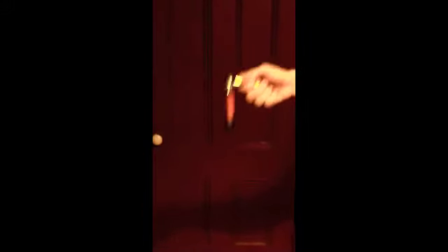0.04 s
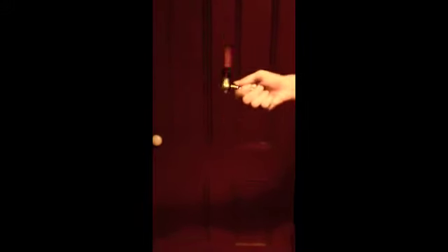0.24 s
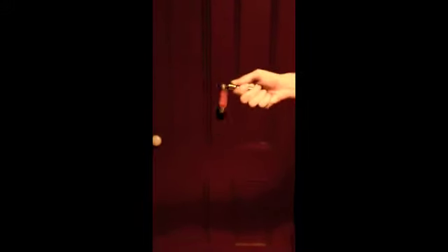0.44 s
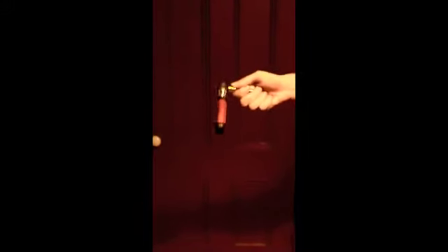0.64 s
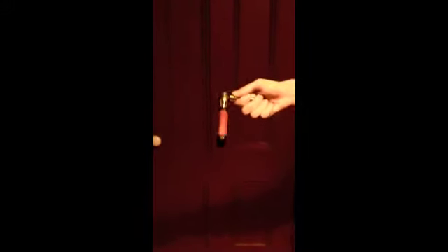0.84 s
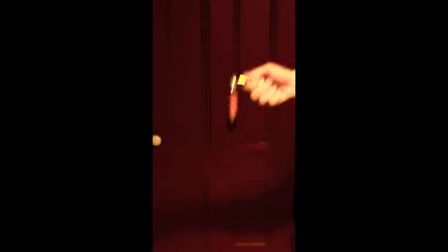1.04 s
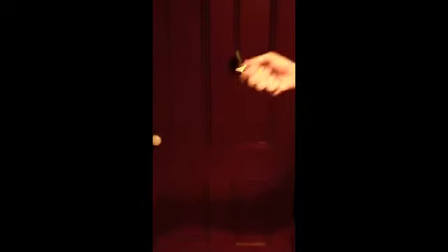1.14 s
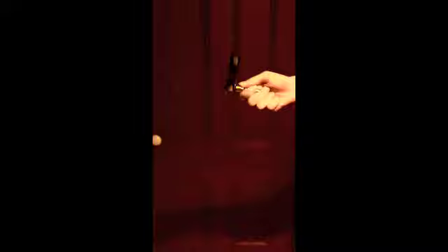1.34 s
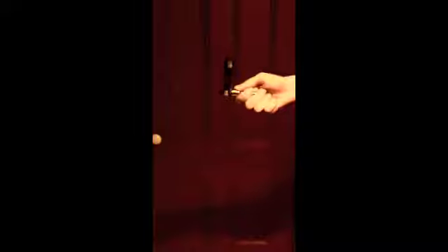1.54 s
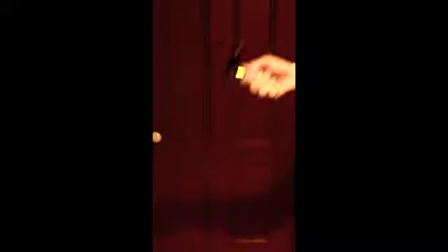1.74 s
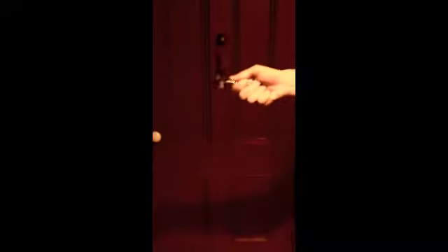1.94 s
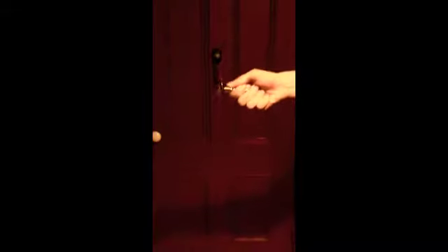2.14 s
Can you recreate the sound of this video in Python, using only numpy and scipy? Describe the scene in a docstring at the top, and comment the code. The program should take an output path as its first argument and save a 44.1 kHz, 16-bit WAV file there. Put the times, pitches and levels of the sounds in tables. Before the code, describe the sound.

A socket ratchet twirled by hand whirrs twice with rapid clicks, then catches with a clack.

```python
"""A small room. A socket ratchet is twirled by its drive end: one long whirr, then a short one.
The pawl snaps over each tooth and rebounds, ringing the steel head; the room smears the clicks
into a whirr. Loose parts tick. At the end the handle drops back and the pawl catches with a clack.
Faint ventilation noise and mains hum underneath."""
import sys
import numpy as np
from scipy import signal
from scipy.fft import rfft, irfft
from scipy.io import wavfile
from scipy.ndimage import uniform_filter1d

SR = 44100
rng = np.random.default_rng(int(sys.argv[2]) if len(sys.argv) > 2 else 0)


def transcribe(u):
    """Save the signal u as a 16-bit wav file named by the first command-line argument.

    u: samples, shape (n,) or (channels, n), limited to [-1, 1]; the rate is SR.
    q: integer samples, one column per channel.
    """
    v = np.clip(np.atleast_2d(u).T, -1, 1)
    q = np.round(v * 32767).astype(np.int16)
    wavfile.write(sys.argv[1], SR, q)


N = 97020

# Pawl slips. Each row: start in seconds, relative level in dB, rebound delay in ms,
# treble gain in dB, body gain in dB.
TOOTH_CLICKS = [(0.181, -19.5, 3.5, -0.5, 4.5), (0.1936, -21, 2.6, 0, 0), (0.202, -20, 2.6, -1, 5),
                (0.2145, -19.5, 2.1, -1, 2), (0.223, -15.5, 2.8, 2, -4), (0.2354, -17.5, 2.0, 1.5, 0.5),
                (0.2441, -17.5, 2.18, -6, -0.5), (0.2538, -21, 1.85, 4, 2.5), (0.259, -21, 0.54, 7, -4),
                (0.268, -16.5, 2.0, 5, -5.5), (0.2779, -21.5, 2.7, -1, -3), (0.29, -17, 2.45, -4, -1),
                (0.297, -31, 0.71, 1, 0), (0.307, -19.5, 2.2, 3, -4), (0.3105, -24, 0.62, 0, -1),
                (0.3206, -17.5, 1.7, 2, -3.5), (0.3292, -18, 1.9, -2, -0.5), (0.3376, -14, 2.7, -4, -2),
                (0.3456, -16.5, 3.0, -1, 0), (0.3516, -26, 0.4, -1, -3), (0.3588, -23, 1.2, 4, -8),
                (0.3642, -16, 1.4, -2.5, -6), (0.3691, -18, 0.3, -1, 3.5), (0.3833, -18, 1.6, -2, 1),
                (0.387, -19.5, 0.4, -4, 2), (0.3949, -18.5, 2.0, -1, -1), (0.405, -16.5, 2.6, -4, -0.5),
                (0.4168, -17, 1.5, -2, -4), (0.4195, -20, 1.0, -3, 2), (0.4281, -17.5, 2.7, 0, 2),
                (0.4347, -18.5, 0.46, -3, 0.5), (0.4421, -18.5, 1.41, 0.5, -0.5), (0.451, -19, 1.8, 7, 1.5),
                (0.46, -20.5, 1.9, 10, 4), (0.4707, -20, 4.0, -1, 3), (0.4836, -17.5, 2.6, 0, 2.5),
                (0.496, -24.5, 2.1, 2, 2.5), (0.5113, -20, 1.8, 0, 2), (1.2061, -22, 2.8, 2, 4),
                (1.2128, -35, 0.51, 12, 1), (1.2187, -22, 2.7, 1, 5.5), (1.2299, -22, 2.8, 4, 3.5),
                (1.2397, -19.5, 2.0, 0, -1), (1.2451, -19, 0.37, -6, 2.5), (1.2531, -19.5, 2.2, -1, -4),
                (1.2698, -23.5, 1.8, 3, -1), (1.2931, -24, 1.1, 2, 2.5), (1.3188, -26.5, 0.3, 3.5, 2)]
# Tooth click colour. Each row: frequency in Hz, relative density in dB.
PAWL_SPECTRUM = [(500, -42), (1000, -23.5), (1700, -14.5), (2150, -12), (2480, -8), (2780, -8.5),
                 (3080, -3.3), (3450, -7.5), (4400, -3.5), (5400, -5), (7300, -3), (9000, -6), (10300, -11),
                 (12000, -8.5), (13300, -13.5), (15500, -15)]
# Head resonance, shifting as the handle swings. Each row: time in seconds, centre in Hz, boost in dB.
HEAD_RESONANCE = [(.18, 4150, 4.5), (.225, 5500, -1), (.29, 4760, 6), (.31, 9400, 6.5), (.338, 7500, 7),
                  (.365, 7200, 5), (.39, 6740, 6), (.42, 5800, 3), (.435, 4170, 3), (.485, 8700, 2.5),
                  (.512, 7660, 9), (1.207, 6140, 0.5), (1.243, 6030, 7), (1.27, 7150, 2), (1.319, 7700, 6)]
# Ring of the steel head. Each row: frequency in Hz, gain in dB, T60 in seconds.
HEAD_MODES = [(1776, -61, 0.17), (2472, -63, 0.27), (2545, -64, 0.14), (3045, -55, 0.19),
              (3100, -48, 0.027), (3130, -56, .22), (4250, -62.5, 0.25), (4390, -53, .25), (7700, -68, .2)]
# The pawl catches. One row: start in seconds, relative level in dB, rebound delay in ms.
PAWL_CATCH = (1.8903, -15, 2.2)
# Clack colour, also the base of the ticks. Each row: frequency in Hz, relative density in dB.
CLACK_SPECTRUM = [(100, -46), (250, -26), (700, -15.5), (1500, -15.5), (2200, -9), (2900, -5.5),
                  (3450, -6.5), (4100, 0.5), (5500, -5), (7000, 1.5), (8150, -3), (8900, -9), (11800, -7.5),
                  (13300, -11), (16000, -19)]
# Ring of the whole tool as the handle stops. Each row: frequency in Hz, gain in dB, T60 in seconds.
TOOL_MODES = [(1030, -62, .2), (1860, -57, .3), (3090, -45, 0.044), (4140, -53, 0.25), (4430, -51, 0.16),
              (12300, -64, .25)]
# Loose parts. Each row: start in seconds, relative level in dB, centre in Hz, width in octaves.
LOOSE_TICKS = [(0.089, -47, 3000, 1.6), (.1651, -30.5, 5450, 0.73), (0.1705, -46, 3200, 0.49),
               (1.1918, -40, 5970, 1.8), (1.202, -34, 5000, 0.91), (1.7480, -46, 5350, 0.26),
               (1.81, -43, 1500, 1.2), (1.8274, -34, 8400, .35), (1.8274, -38, 3050, 0.33),
               (1.8390, -40, 4500, .7), (1.8710, -31, 1500, 2.3), (1.877, -31, 1470, 2.5),
               (1.8836, -35, 1110, 1.1), (1.887, -27.5, 1500, 1.7), (1.8998, -31, 4300, 0.65),
               (2.0130, -34.5, 1840, 0.81)]
# Room decay. Each row: frequency in Hz, T60 in seconds.
ROOM_DECAY = [(300, 0.3), (1400, 0.39), (3500, 0.41), (7000, 0.38), (10000, 0.32), (15000, 0.32)]
# Reverb colour. Each row: frequency in Hz, gain in dB.
ROOM_GAIN = [(300, 8), (1500, 2.5), (3500, -0.58), (7000, -2.5), (11000, -3), (15000, -4.5)]
# Ventilation noise. Each row: frequency in Hz, relative density in dB.
VENT_SPECTRUM = [(15, -78), (25, -51), (37, -22), (48, -23), (70, -17.5), (84, -28), (108, -11.5),
                 (130, -12.5), (149, -16.5), (195, -7.5), (285, -3), (317, -6), (384, -2.5), (489, -9),
                 (695, -9.5), (754, -11), (911, -12), (1840, -17.5), (2550, -20.5), (3820, -22.5),
                 (5280, -21.5), (5880, -25.5), (16000, -38.5)]
# Hum partials. Each row: frequency in Hz, RMS level in dB.
HUM_PARTIALS = [(59.5, -76), (119.6, -71.5), (203, -72), (287, -68)]

PAWL_GAIN_DB, PAWL_HIGHPASS_HZ, RESONANCE_WIDTH_OCT = 13.5, 970, 0.18
BODY_HZ, MIDDLE_HZ, TREBLE_HZ = 2940, 6200, 11500
SCRAPE_DB, SCRAPE_LEAD_S, SCRAPE_LAG_S = -9.5, 0.002, 0.008
REBOUND_DB, SCATTER_DB = -1, 0.5
SNAP_RISE_S, SNAP_DECAY_S = 0.00029, 0.00037
CHATTER_DB, CHATTER_DECAY_S = -22.5, 0.0032
CLACK_GAIN_DB, TICK_GAIN_DB, TICK_PEAK_DB = 12, 11.5, 26.5
ROOM_BUILD_S, WHIRR_SEND_DB, CLACK_SEND_DB = 0.0035, 0.17, -2.5
VENT_RMS_DB, LOWPASS_HZ = -54.5, 15900


def whirr(scrapes_per_tooth=4):
    """The pawl runs over the teeth; its colour follows the swing of the handle."""
    out = np.zeros(N)
    swing_s, centre_hz, boost_db = np.transpose(HEAD_RESONANCE)
    low_cut_db = 10 * np.log10(1 + (PAWL_HIGHPASS_HZ / (bins_hz() + 1)) ** 4)
    pawl_db = log_interp(PAWL_SPECTRUM, bins_hz()) - low_cut_db
    for start_s, level_db, rebound_ms, treble_db, body_db in TOOTH_CLICKS:
        tooth_db = log_interp([(BODY_HZ, body_db), (MIDDLE_HZ, 0), (TREBLE_HZ, treble_db)], bins_hz())
        resonance = bell(np.interp(start_s, swing_s, centre_hz), RESONANCE_WIDTH_OCT)
        colour_db = pawl_db + tooth_db + np.interp(start_s, swing_s, boost_db) * resonance
        strike(out, start_s, level_db, rebound_ms, colour_db)
        # Lesser contacts as the pawl rides up and settles.
        for offset_s in rng.uniform(-SCRAPE_LEAD_S, SCRAPE_LAG_S, scrapes_per_tooth):
            add(out, start_s + offset_s, amp(level_db + SCRAPE_DB) * snap(colour_db))
    return amp(PAWL_GAIN_DB) * out


def strike(mix, start_s, level_db, rebound_ms, colour_db):
    """Adds one blow of the pawl and its rebound; their balance varies at random."""
    balance_db = SCATTER_DB * rng.standard_normal()
    add(mix, start_s, amp(level_db + balance_db) * snap(colour_db))
    add(mix, start_s + rebound_ms / 1000, amp(level_db + REBOUND_DB - balance_db) * snap(colour_db))


def snap(colour_db, smooth_bins=121):
    """One steel-on-steel contact of unit energy: a noise burst with a brief chatter tail."""
    t = np.arange(2 * len(colour_db) - 2) / SR
    attack = 1 - np.exp(-t / SNAP_RISE_S)
    decay = np.exp(-t / SNAP_DECAY_S) + amp(CHATTER_DB) * np.exp(-t / CHATTER_DECAY_S)
    burst = rfft(rng.standard_normal(len(t)) * attack * decay)
    # Flatten, then colour; minimum phase keeps the onset sharp.
    power = uniform_filter1d(abs(burst) ** 2, smooth_bins)
    log_gain = np.log(amp(colour_db) + 1e-5) - 0.5 * np.log(power)
    mirrored = np.concatenate([log_gain, log_gain[-2:0:-1]])
    min_phase = np.exp(np.conj(signal.hilbert(mirrored)))
    click = irfft(burst * min_phase[:len(burst)])
    return click / np.linalg.norm(click)


def steel_ring(clicks, modes):
    """Clicks excite the decaying modes of a steel part."""
    t = np.arange(SR // 2) / SR
    ring = sum(amp(db - 60 * t / t60_s) * np.cos(2 * np.pi * hz * t) for hz, db, t60_s in modes)
    return signal.fftconvolve(clicks, ring)[:N]


def clack():
    """The pawl stops the falling handle."""
    out = np.zeros(N)
    strike(out, *PAWL_CATCH, log_interp(CLACK_SPECTRUM, bins_hz()))
    return amp(CLACK_GAIN_DB) * out


def ticks():
    """Loose parts shift as the tool is tilted."""
    out = np.zeros(N)
    for start_s, level_db, centre_hz, width_oct in LOOSE_TICKS:
        colour_db = log_interp(CLACK_SPECTRUM, bins_hz()) + TICK_PEAK_DB * bell(centre_hz, width_oct)
        add(out, start_s, amp(level_db + TICK_GAIN_DB) * snap(colour_db))
    return out


def room_reverb(send, frame=256):
    """Dense reflections: quick build-up, longest decay in the midrange."""
    reflections = rng.standard_normal(SR) * (rng.random(SR) < 0.2)
    hz, t, spectra = signal.stft(reflections, SR, nperseg=frame)
    decaying = spectra * amp(-60 * t / log_interp(ROOM_DECAY, hz)[:, None])
    coloured = decaying * amp(log_interp(ROOM_GAIN, hz))[:, None]
    build_up = 1 - np.exp(-(np.arange(SR) / SR / ROOM_BUILD_S) ** 2)
    plain_tail = signal.istft(decaying, SR, nperseg=frame)[1][:SR] * build_up
    tail = signal.istft(coloured, SR, nperseg=frame)[1][:SR] * build_up
    return signal.fftconvolve(send, tail / np.linalg.norm(plain_tail))[:N]


def ventilation():
    """Soft, steady noise of moving air."""
    air = irfft(rfft(rng.standard_normal(N)) * amp(log_interp(VENT_SPECTRUM, bins_hz(N))), N)
    return amp(VENT_RMS_DB) * air / air.std()


def mains_hum():
    """Steady low sines at random phases."""
    t = np.arange(N) / SR
    return sum(amp(db) * np.sqrt(2) * np.sin(2 * np.pi * (hz * t + rng.random()))
               for hz, db in HUM_PARTIALS)


def amp(db):
    """Decibels to gain."""
    return 10 ** (np.asarray(db) / 20)


def log_interp(table, hz):
    """Table lookup on a log-frequency axis."""
    table_hz, values = np.transpose(table)
    return np.interp(np.log(hz + 1), np.log(table_hz + 1), values)


def bins_hz(size=2048):
    """FFT bin frequencies."""
    return np.fft.rfftfreq(size, 1 / SR)


def bell(centre_hz, width_oct):
    """Gaussian peak of height 1 over log frequency."""
    return np.exp(-0.5 * (np.log2((bins_hz() + 1) / centre_hz) / width_oct) ** 2)


def add(mix, start_s, sound):
    """Mixes a sound in place."""
    part = mix[round(start_s * SR):][:len(sound)]
    part += sound[:len(part)]


def scene():
    """Ratchet, reverb and background, in mono."""
    teeth, catch, loose = whirr(), clack(), ticks()
    spin = teeth + steel_ring(teeth, HEAD_MODES)
    knocks = catch + steel_ring(catch, TOOL_MODES) + loose + steel_ring(loose, HEAD_MODES)
    reverb = room_reverb(amp(WHIRR_SEND_DB) * spin + amp(CLACK_SEND_DB) * knocks)
    return (spin + knocks + reverb + ventilation() + mains_hum())[None]


def record(dry):
    """Steep low-pass on the top treble."""
    lowpass = signal.firwin(401, LOWPASS_HZ, window=("kaiser", 8), fs=SR)
    return signal.oaconvolve(dry, lowpass[None], "same")


dry = scene()
out = record(dry)
transcribe(out)
```